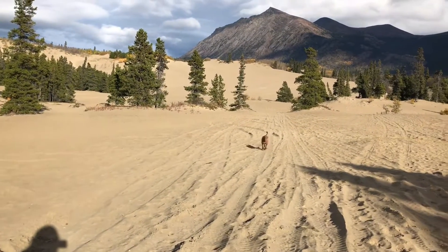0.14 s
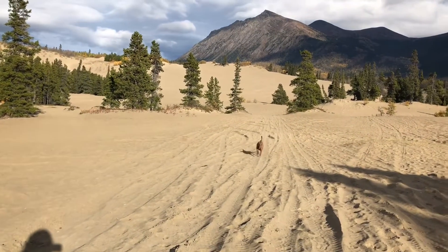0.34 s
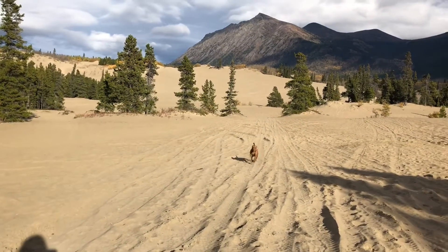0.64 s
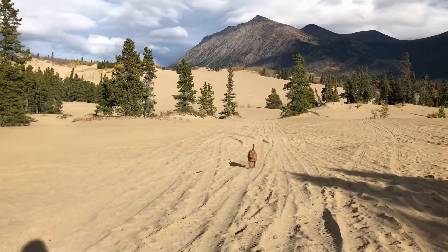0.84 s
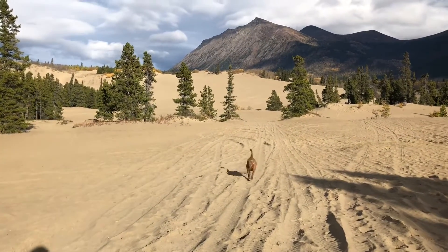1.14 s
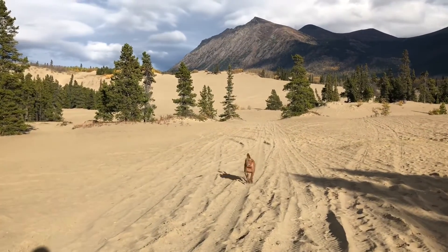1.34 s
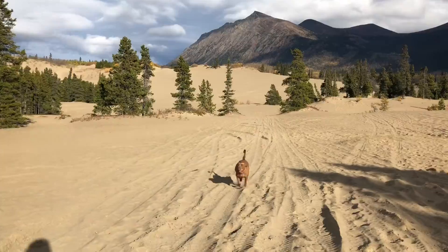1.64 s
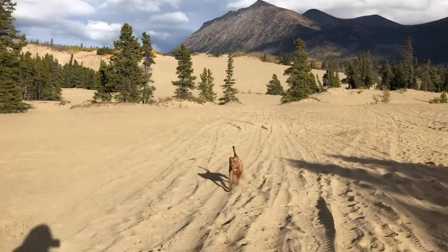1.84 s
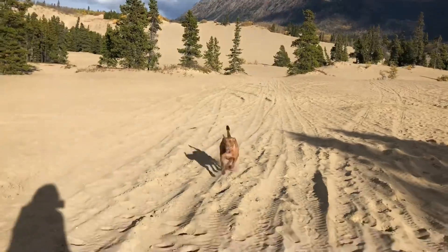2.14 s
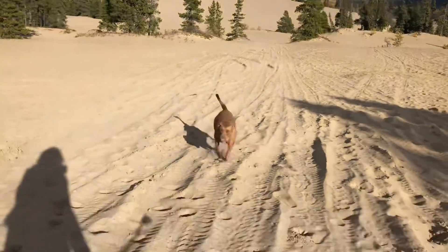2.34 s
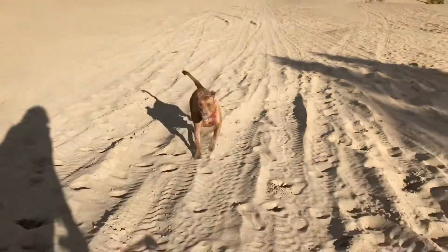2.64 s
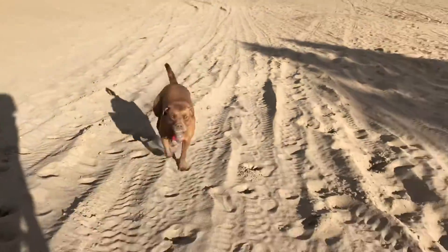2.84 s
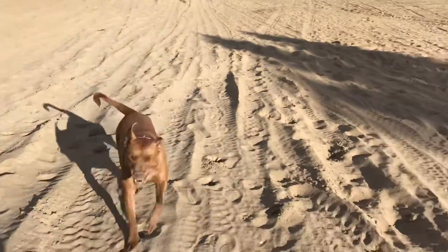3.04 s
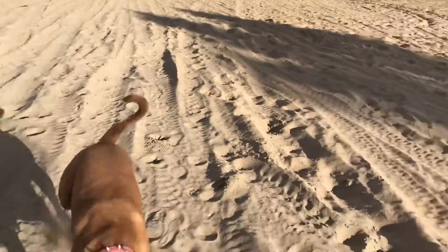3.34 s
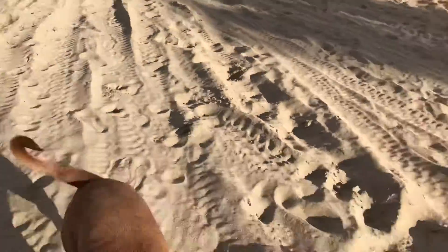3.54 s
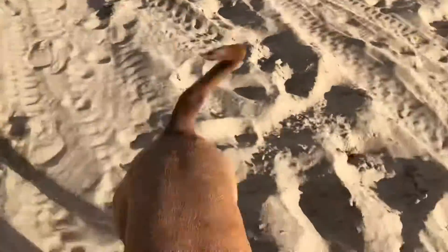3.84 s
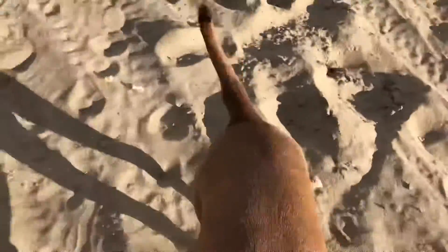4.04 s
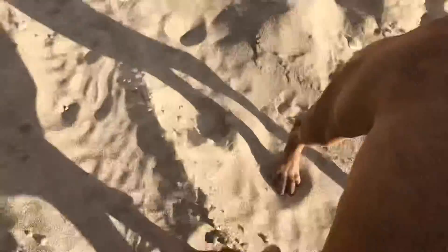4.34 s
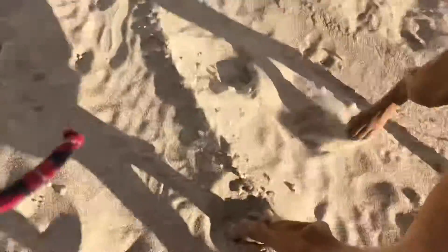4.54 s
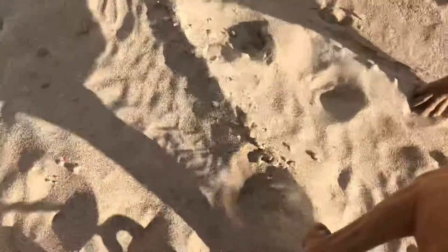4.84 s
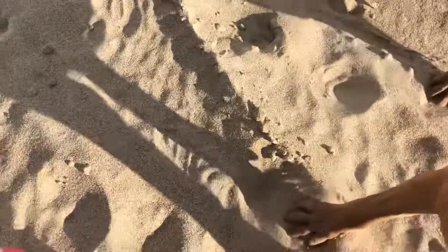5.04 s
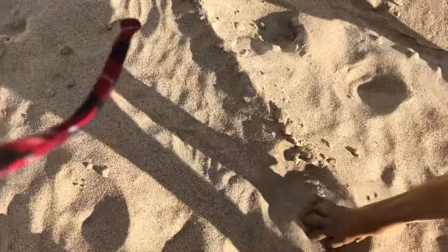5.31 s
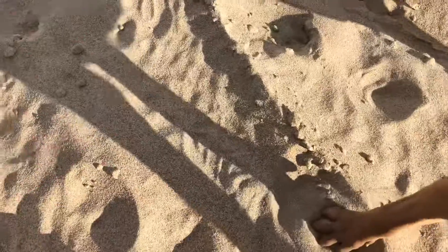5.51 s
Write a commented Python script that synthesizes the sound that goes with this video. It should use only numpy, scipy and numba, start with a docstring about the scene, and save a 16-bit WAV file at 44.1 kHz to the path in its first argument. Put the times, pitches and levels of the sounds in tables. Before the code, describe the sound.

A dog trots up over loose sand, panting ever louder, until hard wind gusts buffet and overload the microphone outdoors.

```python
"""A dog trots up over loose sand, panting: about five strokes of breath a second, out and in by turns.
Each breath is noise ringing through mouth or throat resonances, and the breaths out grow louder.
Gusts buffet the microphone as flickering bands of low noise and short puffs, hardest near the end.
Paws throw sand, made of dense random grains, late in the run; grit and gear tick and knock.
Far trees sough faintly as smooth coloured noise, with bright specks of blown grit."""
import sys
import numpy as np
from scipy import signal
from scipy.fft import rfft, irfft
from scipy.io import wavfile
from scipy.ndimage import uniform_filter1d
from numba import njit

SR = 44100
rng = np.random.default_rng(int(sys.argv[2]) if len(sys.argv) > 2 else 0)


def inscribe(sig):
    """Save sig as 16-bit PCM at rate SR to the path in sys.argv[1].

    A 1-D sig is mono; a 2-D sig holds one channel per row.
    Samples are clipped to [-1, 1] before scaling.
    """
    pcm = np.round(np.clip(np.atleast_2d(sig).T, -1, 1) * 32767)
    wavfile.write(sys.argv[1], SR, pcm.astype(np.int16))


def boost(x):
    """Linear amplitude factor 10**(x/20) for a level x in decibels (scalar or array-like)."""
    u = np.asarray(x, float) / 20
    return 10 ** u


N = 250047  # length in samples
T = np.arange(N) / SR  # time in seconds

# breaths out: start_s, length_s, level_db, swell_db (change from start to end)
BREATHS_OUT = [(0.0, .16, -58.5, 6), (.38, .15, -60, -7), (.765, .14, -56, -1), (1.16, 0.14, -52, 1),
               (1.535, 0.16, -50.5, -1), (1.9, 0.16, -49.5, 11), (2.285, 0.16, -46.5, 5.5),
               (2.68, 0.18, -44, -2), (3.05, 0.13, -39, 7.5), (3.36, 0.17, -38, -16.5),
               (3.78, .16, -39, 0.5), (4.255, 0.19, -36, -21.5), (4.9, .17, -34.5, -17),
               (5.41, 0.27, -37, -10.5)]
# chest, first and second mouth resonance at rest: pitch_hz, width_hz, level_db
CHEST_AND_MOUTH = [(500, 90, -6), (930, 190, 2), (1450, 170, 2)]
# upper mouth resonances at rest: pitch_hz, width_hz, level_db
MOUTH_TOP = [(2500, 340, -10), (3560, 290, -17), (4620, 340, -23), (6500, 1500, -31)]
# mouth shape as the dog nears and turns its head: time_s, first_hz (900 = at rest),
# second_hz (1450 = at rest), chest_db, first_db, upper_db
MOUTH_SHAPE = [(0.0, 960, 1450, 9, -5, 3), (.45, 955, 1440, 3, 0.5, 6.5), (1.2, 885, 1415, 5, -2, 3.5),
               (1.65, 960, 1430, 6, -8, 0), (2.4, 930, 1470, -3, -2, -1.5),
               (2.76, 894, 1400, -8.5, 5.5, 2.5), (3.05, 900, 1430, -12, -28, 0.5),
               (3.17, 925, 1480, -34, -20, -1), (3.37, 1190, 1290, 5.5, 6.5, -6),
               (3.47, 1050, 1620, 18.5, -7, 4), (3.8, 840, 1570, -1.5, 2, 3),
               (3.92, 800, 1620, 15.5, 1.5, -5), (4.27, 890, 1390, -7, -14, -21),
               (4.38, 1070, 1410, 12, -5, -6), (4.92, 950, 1430, -2, -7, -1.5), (5.02, 940, 1260, 7, 10, 8),
               (5.44, 920, 1414, 14, 2, -10), (5.6, 885, 1310, 11, 4, -11)]
# gusts on the microphone: start_s, length_s, level_db, swell_db, tilt_db_per_octave (before offset and cap)
GUSTS = [(-.03, 0.098, -38, -26, -15), (.07, 0.17, -55, 15, -15), (.225, .12, -34, 25, -2),
         (.36, 0.15, -32.5, 7, -4), (.49, 0.11, -29, -4, -5.5), (.58, 0.095, -39.5, -10, -15),
         (.69, 0.17, -45.5, -8.5, -12), (.985, 0.11, -53, -17.5, -7), (1.2, 0.11, -52, 15, -14),
         (1.27, 0.18, -35, -14, -0.5), (1.42, 0.13, -25, 9, -1.5), (1.545, 0.15, -31.5, 8, -2),
         (1.66, 0.11, -35.5, -17, -11), (1.76, 0.21, -40.5, 5, -6), (1.955, 0.081, -38, -28, -8.5),
         (2.095, .13, -33.5, 5, -6.5), (2.26, 0.23, -54, -23, -2), (2.47, 0.058, -36.5, -10, -5),
         (2.635, 0.23, -51, -20, -3), (2.8, 0.096, -52, -24, 39), (2.94, 0.16, -45.5, 7, 19),
         (3.12, 0.029, -42, 13, -2), (3.19, .08, -38, 5, -15), (3.33, 0.19, -50, 20, 2),
         (3.5, .23, -45, -2.5, 1), (3.78, 0.14, -44, 1, 6), (3.95, 0.16, -50.5, -4, 0),
         (4.09, 0.14, -49.5, -1, 0), (4.21, 0.22, -38.5, -20, 0), (4.44, 0.11, -39, 1, -5),
         (4.575, 0.16, -32.5, 11, 0), (4.67, 0.18, -18, 22, 5), (4.85, 0.25, -23.5, -3.5, 7),
         (5.05, 0.22, -20.5, -12.5, 3.5), (5.24, 0.22, -24, 25, 1.5), (5.455, 0.057, -15, 8, 4),
         (5.55, 0.073, -14, -7, 1.5), (5.61, 0.12, -23, 0, 3), (4.67, 1.02, -32, 15, 1.5)]
# spectrum of a gust: pitch_hz, density_db (per Hz)
GUST_SPECTRUM = [(12, -46), (20, -40), (54, -2), (166, -1.5), (376, -5), (538, -8), (1190, -27),
                 (1350, -29), (1850, -61), (3000, -69), (3900, -67), (6600, -120)]
# spectrum of the far trees: pitch_hz, density_db (per Hz)
TREE_SPECTRUM = [(150, -15), (250, 4.5), (392, -5), (720, 1), (842, 4.5), (1040, -2.5), (1420, 0),
                 (1740, -7.5), (3040, -14.5), (4690, -16.5), (5210, -18.5), (15800, -36.5)]
# dry ticks of grit and gear: start_s, peak_db, pitch_hz, t60_s (time to fall 60 dB)
TICKS = [(0.1354, -55.5, 2870, 0.017), (0.657, -47.5, 1980, 0.014), (0.7188, -64, 1810, 0.025),
         (1.355, -27.5, 2040, 0.017), (1.377, -45, 3560, 0.022), (1.3874, -49, 1940, 0.025),
         (1.422, -47, 2450, 0.022), (1.5576, -42, 2090, 0.025), (1.7496, -32, 2090, 0.014),
         (1.922, -43, 2210, 0.022), (2.9405, -33, 1930, 0.025), (3.342, -17.5, 7060, 0.036),
         (3.3705, -19, 3560, 0.022), (3.5794, -38, 6750, 0.025), (3.6202, -27, 3230, 0.071),
         (3.759, -60, 2080, 0.013), (4.105, -42, 2310, 0.028), (4.1937, -23.5, 1800, 0.023),
         (4.2844, -18.5, 1850, 0.098), (4.81, -33, 1820, 0.021), (4.924, -21.5, 2150, 0.089),
         (5.359, -53, 1800, 0.019), (5.6091, -22, 5900, 0.022), (5.653, -32, 1860, 0.042)]
# soft knocks of paws and gear: start_s, level_db, pitch_hz, cycles
KNOCKS = [(0.136, -38.5, 299, 2.9), (1.75, -35, 357, 3), (3.377, -16, 1200, 1.4), (3.382, -17.5, 1310, 1.5),
          (3.759, -37.5, 704, 1.9)]
# single puffs of wind: start_s, level_db, pitch_hz, cycles
PUFFS = [(0.226, -37.5, 132, 1.6), (0.28, -36, 145, 0.78), (0.308, -25, 230, 1.4), (0.367, -26, 137, 0.8),
         (0.401, -37, 153, 2.5), (0.456, -24.5, 182, 1.9), (0.688, -44, 103, 1.3), (1.286, -18.5, 144, 1.3),
         (1.315, -18.5, 171, 0.83), (1.438, -21.5, 186, 3.2), (1.584, -30, 187, 1.5),
         (1.627, -21.5, 205, 2.1), (1.812, -41, 164, 1.2), (1.853, -43, 102, 2.1), (1.914, -36.5, 116, 1.5),
         (1.961, -31.5, 102, 0.61), (2.107, -32, 253, 1.6), (2.177, -30, 133, 0.7), (2.268, -41.5, 132, 2),
         (2.487, -42, 103, 2.1), (1.467, -26, 296, 2.5), (1.489, -42, 345, 0.96), (1.515, -25, 318, 0.91),
         (4.637, -36, 410, 1.6), (4.69, -22, 298, 1.3), (4.701, -10.5, 418, 0.78), (4.729, -21, 301, 1.3),
         (4.756, -9, 274, 2.5), (4.775, -7, 870, 1.6), (4.798, -4.5, 467, 0.89), (4.832, -12, 287, 3.2),
         (4.849, -10, 353, 1.5), (4.887, -16, 620, 2.5), (4.902, -12.5, 302, 2.2), (4.974, -15, 555, 1.6),
         (5.004, -17, 509, 1.7), (5.069, -11.5, 574, 3.1), (5.092, -10.5, 543, 2.6), (5.143, -27, 398, 1.6),
         (5.159, -6, 390, 0.73), (5.18, -18, 345, 0.81), (5.264, -19.5, 301, 1.8), (5.289, -18.5, 296, 2),
         (5.326, -17, 490, 4), (5.365, -18, 339, 1.5), (5.409, -17, 556, 4.4), (5.424, -11, 446, 1.7),
         (5.453, -13, 298, 2), (5.474, -13, 575, 3.4), (5.575, -15, 568, 4.2), (5.595, -5.5, 567, 2.15)]
# breaths in, and one short hiss near 3.6 s, probably a paw scuff:
# start_s, length_s, level_db, swell_db, low_resonances_db
BREATHS_IN_AND_HISS = [(.2, .12, -76, -8, -23), (.58, .11, -72, 1, 0), (.945, 0.18, -76, 0, 0),
                       (1.36, 0.12, -71, 1, 0), (1.72, .15, -64, -8, -2.5), (2.09, 0.14, -60.5, 8, -4.5),
                       (2.46, 0.17, -57, 4, -4), (2.87, 0.12, -60, 7, 5.5), (3.535, 0.098, -63.5, -21, 1.5),
                       (3.605, .14, -56.5, -32.5, -3.5), (3.95, 0.35, -69, -23.5, 5),
                       (4.43, 0.15, -69.5, -18, 5.5), (5.11, 0.2, -58, 0, 5.5)]
# low throat resonances, breathing in: pitch_hz, width_hz, level_db
THROAT_LOW = [(1050, 576, 5), (2090, 150, -15)]
# high throat resonances, breathing in: pitch_hz, width_hz, level_db
THROAT_TOP = [(3880, 400, -4), (5860, 230, -15.5), (6600, 1600, -19.5)]
# scuffs of paws in the sand: start_s, length_s, level_db, swell_db, tilt_db_per_octave
SCUFFS = [(2.9, 0.082, -52.5, 29, -2), (2.98, 0.12, -57.5, -24, -4.5), (3.07, 0.1, -49, 15, -2),
          (3.27, 0.061, -61, 12, -12), (3.305, 0.042, -27.5, 8, 5.5), (3.325, 0.043, -34.5, -5, -2.5),
          (3.35, 0.16, -44, -40.5, -2.5), (3.54, 0.09, -56.5, -17, -2.5), (3.605, 0.064, -59, -35, -6),
          (3.79, 0.16, -54, 4, 2), (3.94, 0.084, -65, -21, 1), (4.12, 0.077, -43, 7, -5),
          (4.165, .09, -39.5, -2, 2), (4.24, 0.085, -43.5, 4, -4), (4.295, .1, -34, -14, -3.5),
          (4.52, 0.076, -54.5, 0, -4.5), (4.575, 0.09, -55, -15, -4), (4.83, 0.11, -45.5, -8, -2),
          (4.915, .15, -47, -8, -1.5), (5.11, .05, -50.5, -3, -4), (5.345, 0.026, -47, -12, 7),
          (5.41, .21, -49, -3.5, -7), (5.635, 0.044, -41, -6, 5)]
# sand running back between the scuffs: start_s, length_s, level_db, swell_db, tilt_db_per_octave
TRICKLE = (3, 2.9, -60.5, -0.5, 0.5)
# spectrum of thrown sand: pitch_hz, density_db (per Hz)
GRIT_SPECTRUM = [(250, -2.5), (600, -6), (1200, -2), (2000, 0.5), (3000, -4), (5000, -4.5), (8000, -8.5),
                 (10000, -14), (16000, -15)]


@njit
def svf(x, hz, width):
    """State-variable band-pass with a moving centre, gain 1 at the centre."""
    y, band, low = np.empty(len(x)), 0., 0.
    for i in range(len(x)):
        g, k = np.tan(np.pi * hz[i] / SR), width / hz[i]
        v = (band + g * (x[i] - low)) / (1 + g * (g + k))
        band, low, y[i] = 2 * v - band, low + 2 * g * v, k * v
    return y


def unit(x):
    """Scale to an rms (average strength) of 1."""
    return x / np.sqrt(np.mean(x ** 2))


def walk(rate):
    """Random wandering: levels held 1 / rate seconds, smoothed twice, scaled to rms 1."""
    hold = int(SR / rate)
    steps = np.repeat(rng.standard_normal(N // hold + 1), hold)
    return unit(uniform_filter1d(uniform_filter1d(steps, hold), hold)[:N])


def colour(x, points):
    """Filter a signal along a curve of (Hz, dB) points, then scale it to rms 1."""
    hz, db = np.transpose(points)
    f = np.fft.rfftfreq(len(x), 1 / SR) + 1
    curve_db = np.interp(np.log(f), np.log(hz), db, -90, db[-1])
    return unit(irfft(rfft(x) * boost(curve_db), len(x)))


def ring(x, modes, stretch=1.):
    """Steep resonances side by side, every other one flipped; stretch moves their pitches."""
    out = 0
    for k, (hz, width, db) in enumerate(modes):
        centre = np.full(N, hz * 1.) * stretch
        # two passes, each 1.5 times as wide, narrow to about the given width
        tone = unit(svf(svf(x, centre, 1.5 * width), centre, 1.5 * width))
        # a wider resonance lets more noise through
        out = out + (-1) ** k * boost(db) * tone * np.sqrt(width / 300)
    return out


def sprinkle(rate, spread_db):
    """Random impulses, about rate a second, a few much larger than the rest."""
    hit = rng.random(N) < rate / SR
    size = rng.exponential(size=N)
    sign = rng.standard_normal(N)
    return hit * sign * boost(spread_db * size)


def strokes(rows, attack_s, release_s, arch_db):
    """Each row fades in, swells, arches and dies away; returns the gain and the blended last column."""
    gain, column = np.full(N, 1e-9), np.zeros(N)
    for s, length, db, swell_db, *rest in rows:
        along = np.clip((T - s) / length - .5, -.5, .5)  # from -.5 at the start to .5 at the end
        fade_in = np.clip((T - s) / attack_s, 0, 1) ** 2
        # falls 15 dB in every release time
        tail_db = -15 * np.maximum(T - s - length + release_s, 0) / release_s
        one = fade_in * boost(db + swell_db * along - 4 * arch_db * along ** 2 + tail_db)
        gain, column = gain + one, column + one * sum(rest)
    return gain, column / gain


def breath_out():
    """Turbulent air and the irregular slaps of wet tissue ring the open mouth."""
    gain, _ = strokes(BREATHS_OUT, attack_s=0.018, release_s=0.031, arch_db=5.5)
    s, *shape = np.transpose(MOUTH_SHAPE)
    first_hz, second_hz, chest_db, first_db, upper_db = (np.interp(T, s, c) for c in shape)
    slaps = unit(sprinkle(250, 1.5))
    air = rng.standard_normal(N) * boost(2.5 * walk(200)) + .7 * slaps
    first_stretch, second_stretch = first_hz / 900, second_hz / 1450
    chest = boost(chest_db) * ring(air, CHEST_AND_MOUTH[:1])
    first = boost(first_db) * ring(air, CHEST_AND_MOUTH[1:2], first_stretch)
    second = ring(air, CHEST_AND_MOUTH[2:], second_stretch)
    # the upper resonances move less than the second
    upper = boost(upper_db) * ring(air, MOUTH_TOP, second_stretch ** 0.74)
    hiss = boost(-26.5) * ring(air, [(10900, 14400, -14.5)])
    return gain * (chest - first + second - upper - hiss) * boost(-1.5)


def wind():
    """Eddies burst on the microphone; half-octave bands flicker alone, and harder gusts may reach higher."""
    gain, tilt_db = strokes(GUSTS, attack_s=0.018, release_s=0.027, arch_db=3)
    gain = gain + boost(-63)  # light air in the lulls
    # a light air cannot be bright
    tilt_db = np.minimum(tilt_db, (20 * np.log10(gain) + 45) / 3)
    hz, gust_db = np.transpose(GUST_SPECTRUM)
    rush = rng.standard_normal(N) * boost(3.5 * walk(35))
    eddies = unit(sprinkle(200, 1.6)) + .6 * rush
    out = 0
    for k, centre in enumerate(28 * 2 ** np.arange(0, 6.6, .5)):
        band = (-1) ** k * ring(eddies, [(centre, centre / 2.5, 0)])
        octaves_up = max(np.log2(centre / 125), 0)
        band_db = np.interp(np.log(centre), np.log(hz), gust_db)
        out = out + band * boost(band_db + (tilt_db - 5.0) * octaves_up + 2.13 * walk(14))
    return unit(out) * gain * boost(-3.0)


def trees():
    """Distant sough: nearly smooth noise whose level wanders a little."""
    air = rng.standard_normal(N) * boost(.8 * walk(5))
    return colour(air, TREE_SPECTRUM) * boost(-58.5)


def specks():
    """Faint bright specks of blown grit: random hits smeared into tiny bursts of high noise."""
    hits = signal.lfilter([1], [1, -.9], sprinkle(13, 2.1)) * rng.standard_normal(N)
    return boost(-53.5) * svf(hits, np.full(N, 10000.), 9000.)


def ticks():
    """A sharp snap with a short crackle after it, coloured around each tick's pitch."""
    out, t = np.zeros(N + SR), np.arange(SR // 10) / SR
    for (s, db, hz, t60), noise in zip(TICKS, rng.standard_normal((len(TICKS), len(t)))):
        push = (noise + 6 * (t == 0)) * np.exp(-np.log(1000) * t / max(t60, .003))
        centre = np.full(len(t), hz * 1.)
        snap = svf(svf(push, centre, 0.23 * hz), centre, 2.0 * hz)
        body = boost(-7) * svf(push, 0.42 * centre, 0.27 * hz)
        crack = snap + body
        out[int(s * SR):][:len(t)] += boost(db) * crack / np.abs(crack).max()
    return out[:N]


def knocks_and_puffs():
    """Each knock or puff is a short swing of a few cycles that rises fast and dies."""
    out, rows = np.zeros(N + SR), KNOCKS + PUFFS
    for (s, db, hz, cycles), turn in zip(rows, rng.random(len(rows))):
        t = np.arange(SR // 8) / SR * hz / max(cycles, .3)  # time counted in swing lengths
        shape = (t / 0.32 * np.exp(1 - t / 0.36)) ** 2
        out[int(s * SR):][:len(t)] += boost(db) * shape * np.cos(2 * np.pi * (t * cycles + turn))
    return out[:N]


def breath_in_and_hiss():
    """Air drawn past tongue and teeth, thin with a breathy whistle; one likely paw scuff is made the same way."""
    gain, low_db = strokes(BREATHS_IN_AND_HISS, attack_s=0.014, release_s=0.028, arch_db=0.5)
    whistle_hz = 4360 * (1 + .02 * walk(8))
    air = rng.standard_normal(N) * boost(1.64 * walk(120))
    whistle = unit(svf(svf(air, whistle_hz, 450.), whistle_hz, 450.))
    throat = ring(air, THROAT_TOP) + boost(low_db) * ring(air, THROAT_LOW)
    return gain * (whistle + throat)


def sand():
    """Dense grains over hiss, in bands that swell and thin alone; each scuff's tilt dulls or brightens it."""
    gain, tilt_db = strokes(SCUFFS + [TRICKLE], attack_s=0.02, release_s=0.025, arch_db=5.5)
    grains = unit(sprinkle(4000, 1.45)) + 1.13 * rng.standard_normal(N)
    spray = colour(grains * boost(2.0 * walk(90)), GRIT_SPECTRUM)
    # a close echo off ground and legs cuts notches that slide as the dog moves
    delay_s = .0007 * (1 + .15 * walk(8))
    spray = spray + .3 * np.interp(T - delay_s, T, spray)
    out = 0
    for k, centre in enumerate(280 * 2 ** np.arange(0, 5.9, 1 / 3)):
        hz = np.full(N, centre)
        band = svf(svf(spray, hz, centre / 3), hz, centre / 3)
        octaves = np.log2(max(centre, 1400) / 6000)  # the tilt levels off below 1400 Hz
        out = out + (-1) ** k * band * boost(tilt_db * octaves + 2.05 * walk(18))
    return out * gain


def scene():
    """Everything reaches one microphone in the open."""
    air = breath_out() + wind() + trees() + specks()
    return (air + ticks() + knocks_and_puffs() + breath_in_and_hiss() + sand())[None]


def band_limit(x):
    """A steep low-pass at the top of the band."""
    return signal.sosfilt(signal.butter(12, 16090, fs=SR, output="sos"), x)


def record(dry):
    """The phone softly rounds the loudest puffs."""
    mix = np.tanh(1.266 * dry) / 1.193
    return band_limit(mix)


dry = scene()
out = record(dry)
inscribe(out)
```